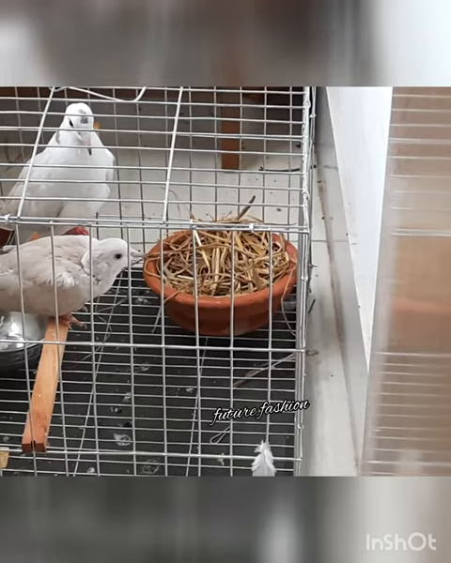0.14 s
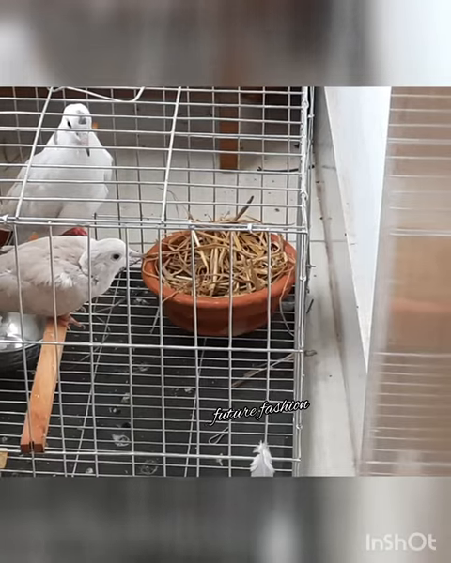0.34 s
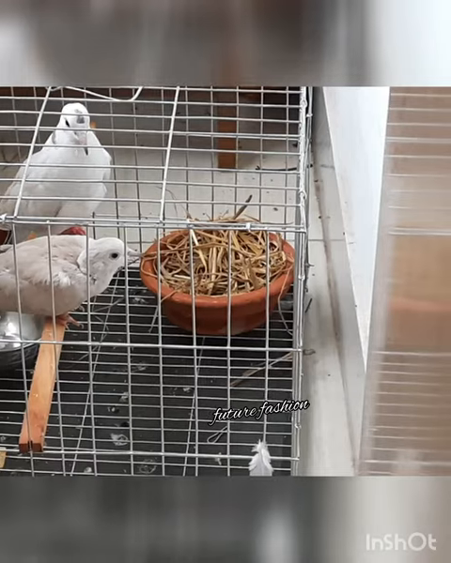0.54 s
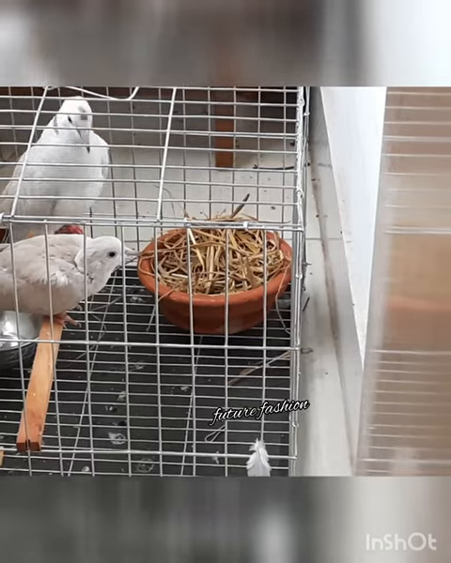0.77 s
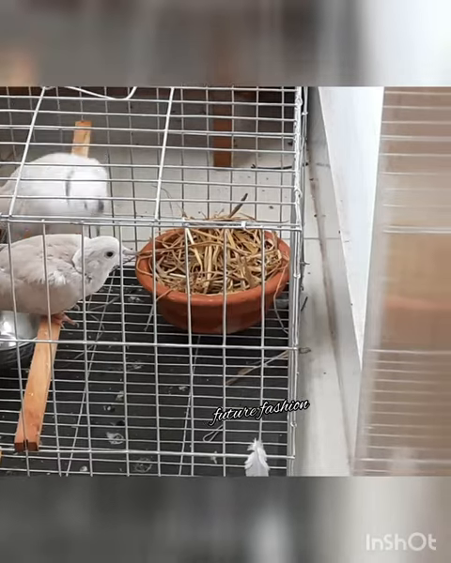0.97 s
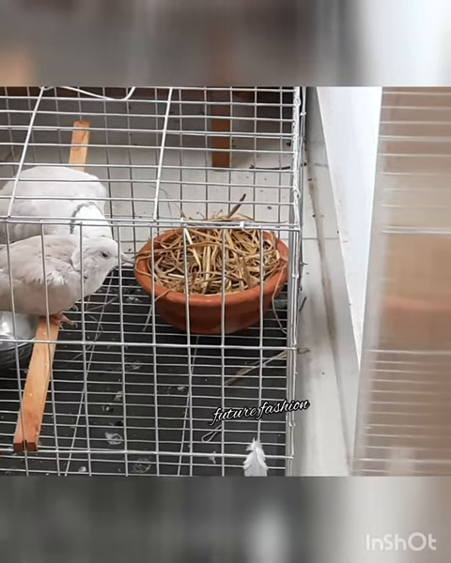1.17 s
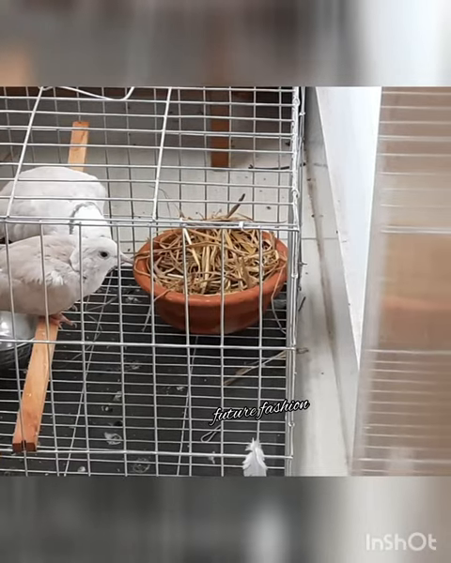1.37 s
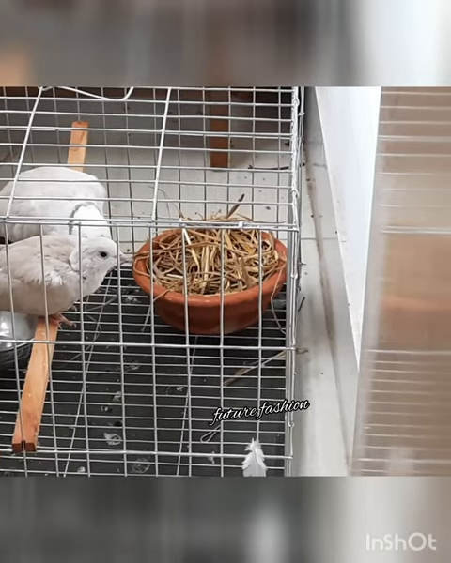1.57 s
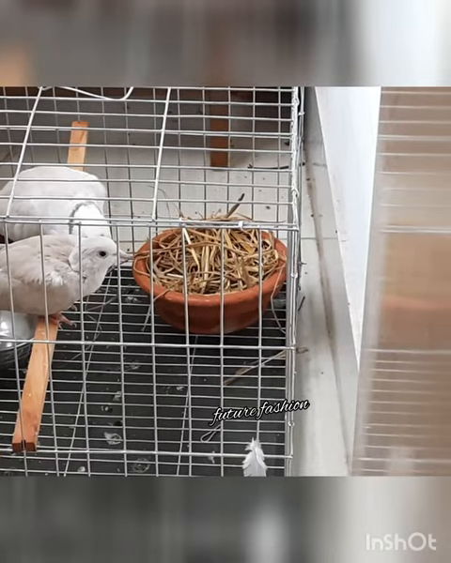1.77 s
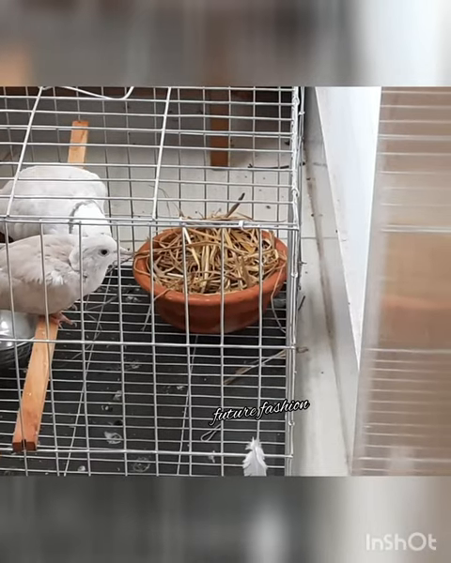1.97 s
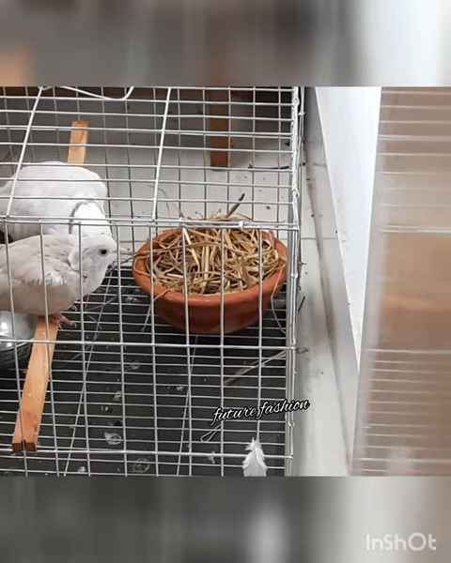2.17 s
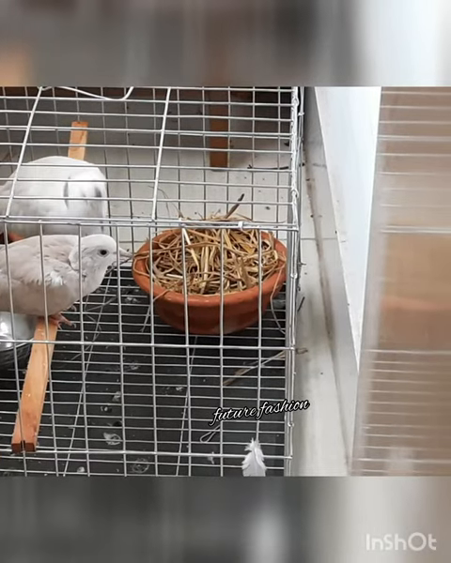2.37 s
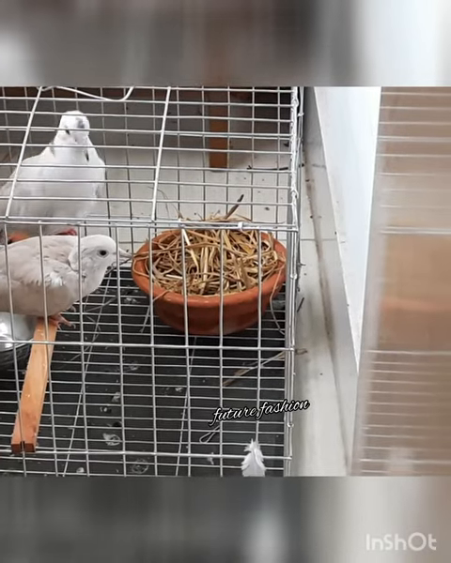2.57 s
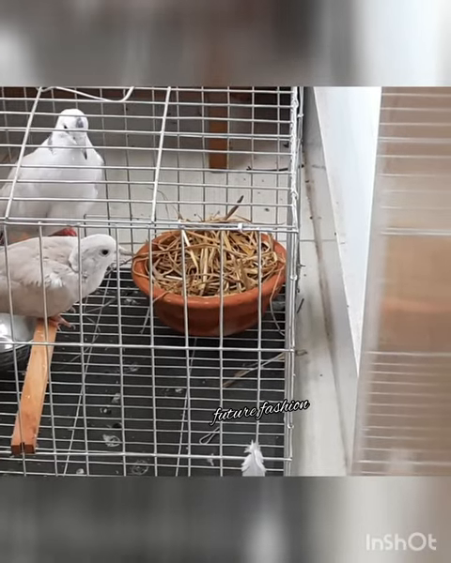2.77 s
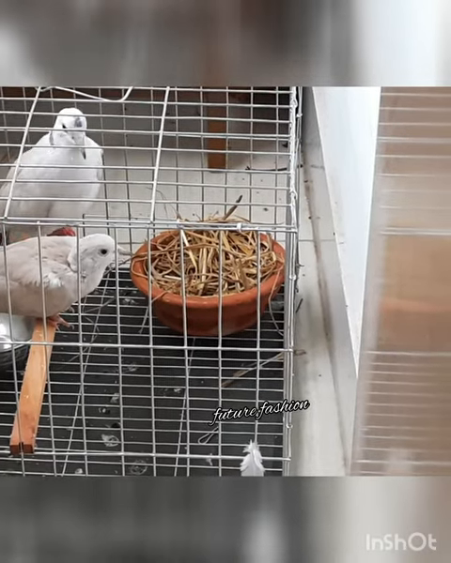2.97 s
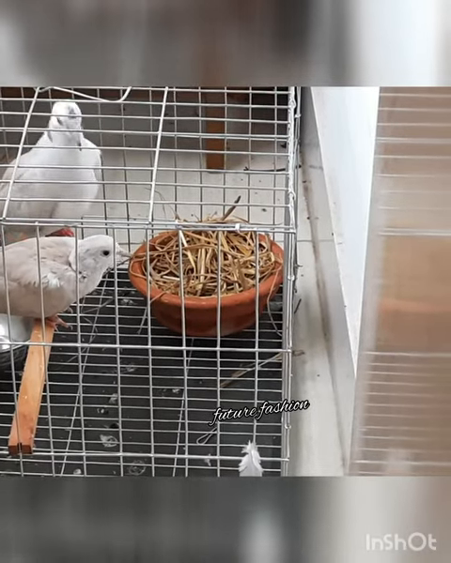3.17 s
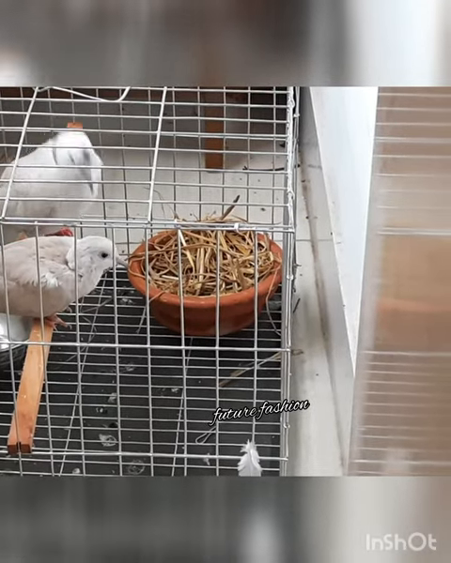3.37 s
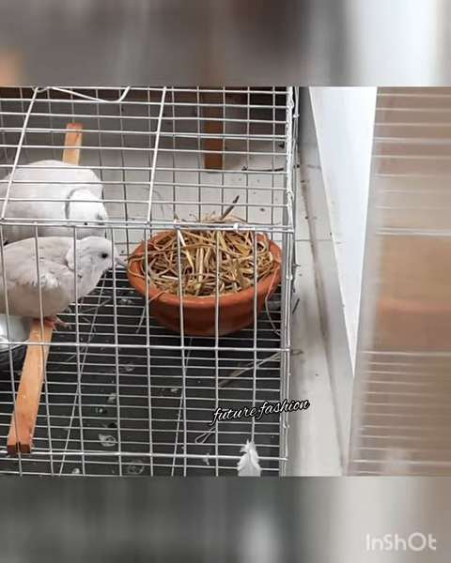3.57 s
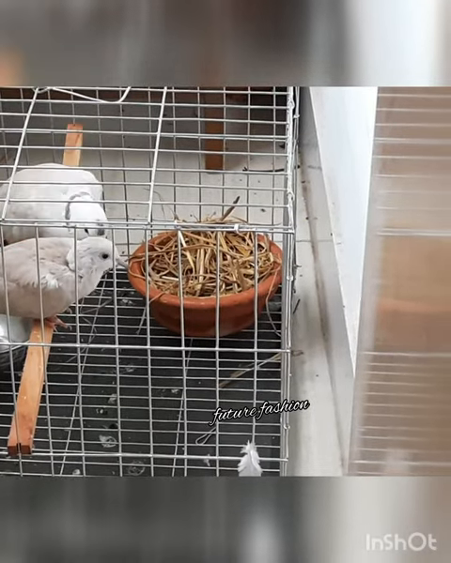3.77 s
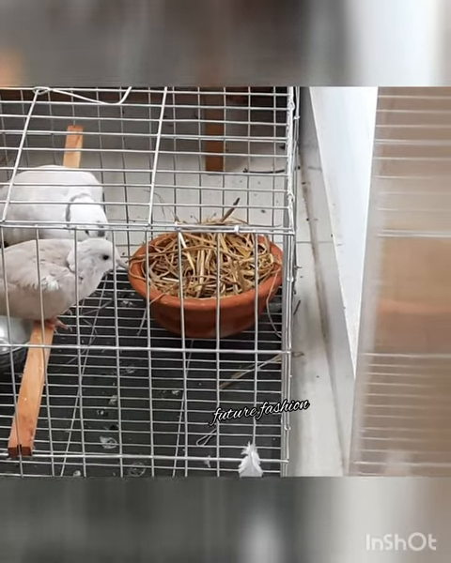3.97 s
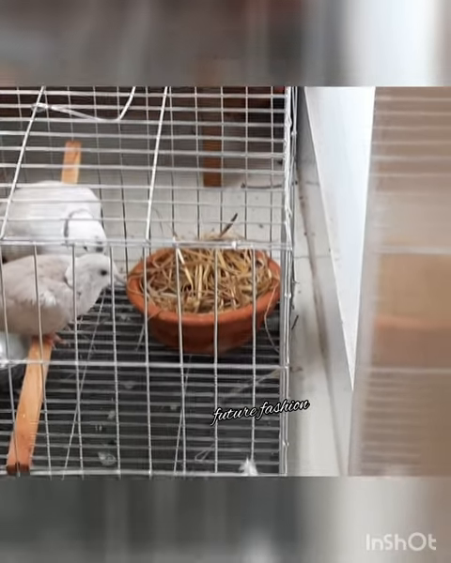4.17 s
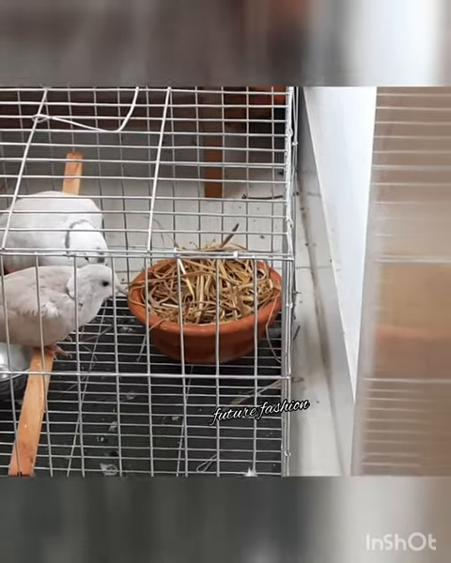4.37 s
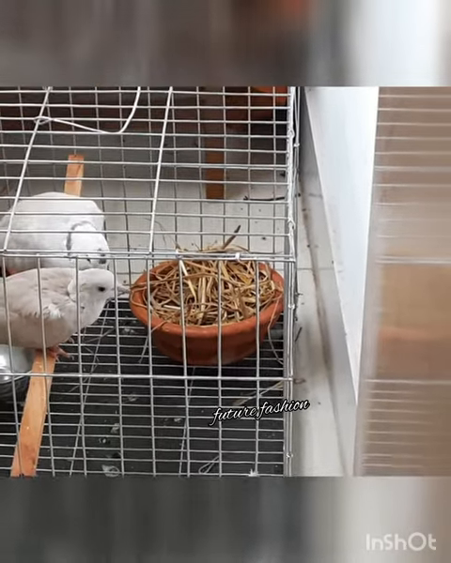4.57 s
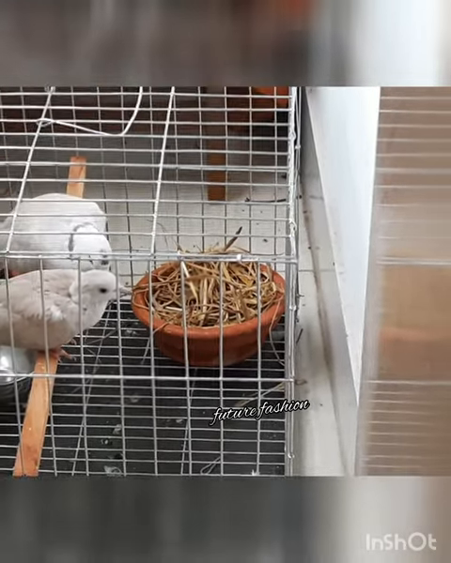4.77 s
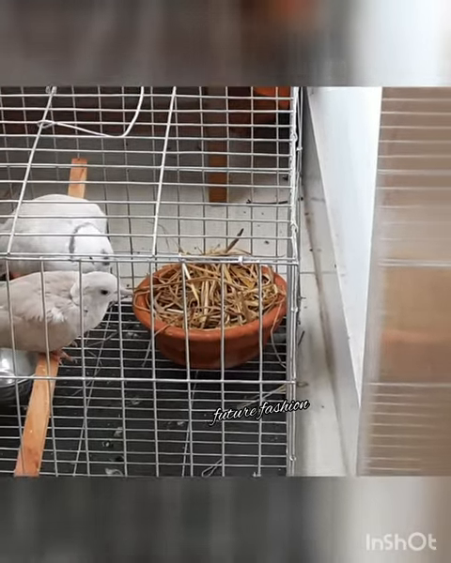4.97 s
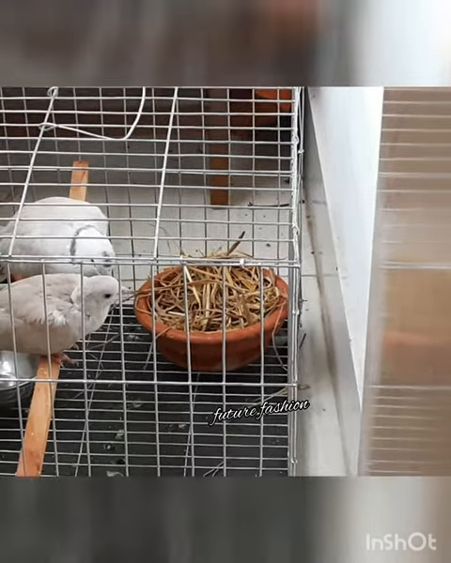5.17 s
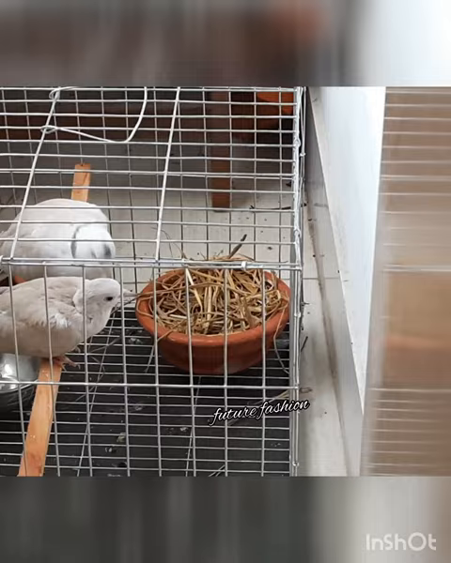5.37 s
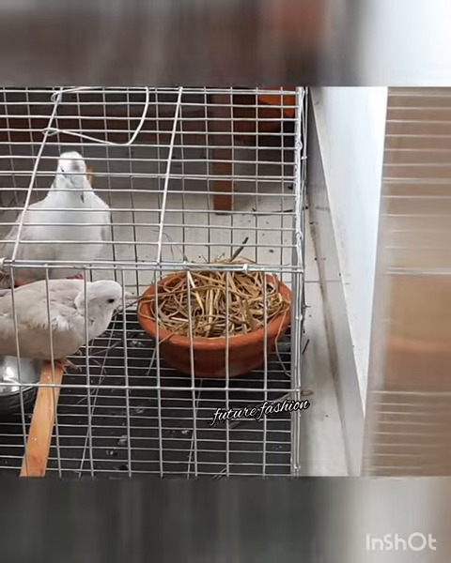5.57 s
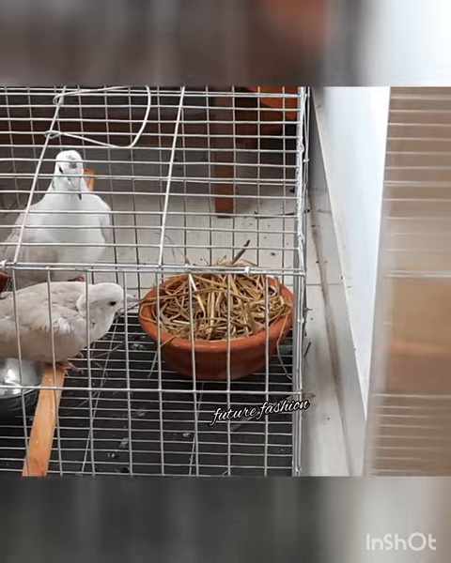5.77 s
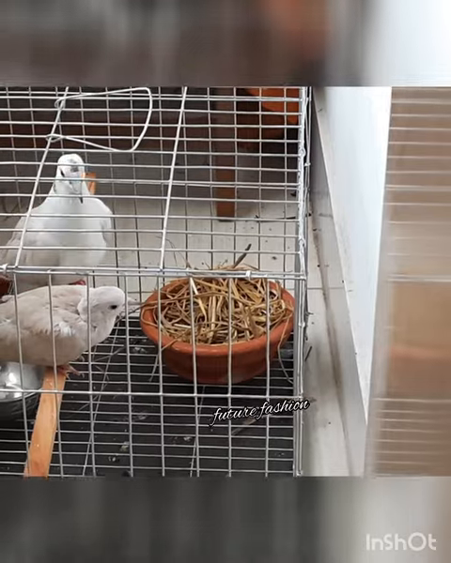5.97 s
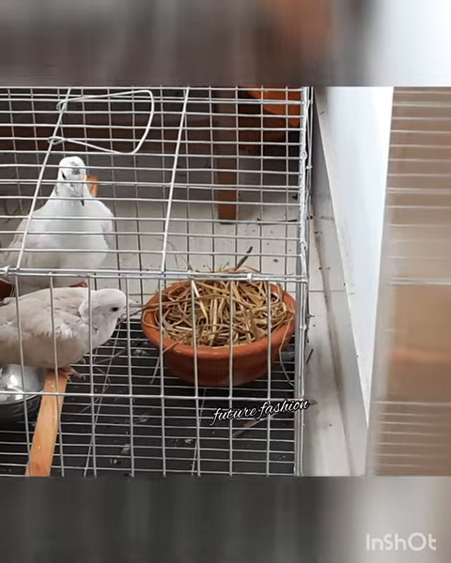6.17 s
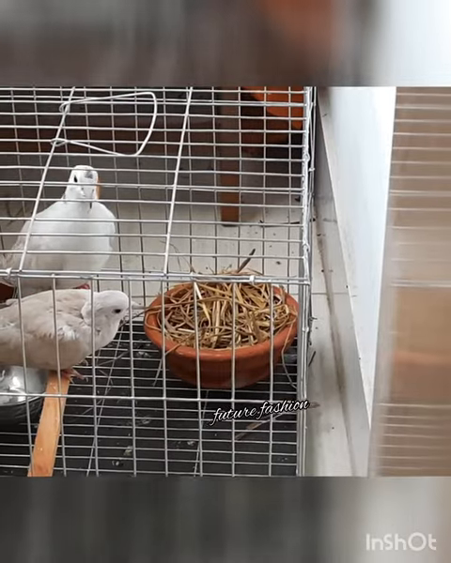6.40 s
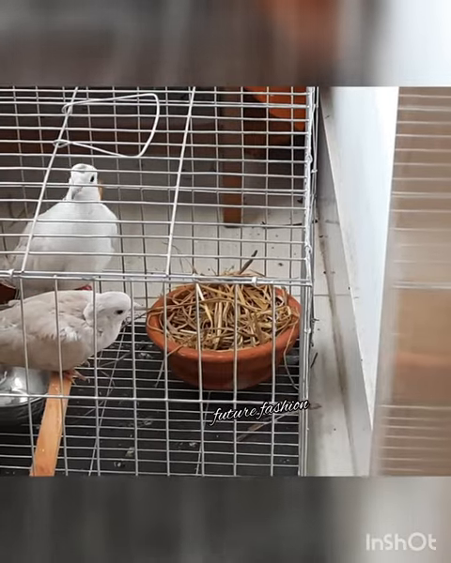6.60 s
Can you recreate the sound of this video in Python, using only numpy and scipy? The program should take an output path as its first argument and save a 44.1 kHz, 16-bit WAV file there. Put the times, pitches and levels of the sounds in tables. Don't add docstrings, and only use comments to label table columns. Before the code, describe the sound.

A dove close by finishes one long sinking coo, then gives two full calls: a short soft hoot, a rolled purring trill that grows stronger, slow throbbing beats, and a long swelling note that breaks downward. The hard wall makes it ring. Behind are low town rumble, a faint motor hum, tiny bird chirps, a thin cricket and a distant dove.

```python
import sys
import numpy as np
from scipy import signal
from scipy.fft import rfft, irfft
from scipy.io import wavfile
from scipy.ndimage import uniform_filter1d

SR = 44100
rng = np.random.default_rng(int(sys.argv[2]) if len(sys.argv) > 2 else 0)


def dump(signal):
    limited = np.clip(np.atleast_2d(signal).T, -1, 1)
    pcm = np.round(limited * 32767).astype(np.int16)
    wavfile.write(sys.argv[1], SR, pcm)


def rack_gain(trim_db):
    fader = np.asarray(trim_db, float)
    return 10 ** (fader / 20)


N = 292804


def evened(x):
    return x / np.sqrt(np.mean(x ** 2) + 1e-20)


def read(points, hz):
    f, value = np.transpose(points)
    return np.interp(np.log(hz + 1), np.log(f + 1), value)


def add(mix, s, sound):
    part = mix[..., round(s * SR):][..., :sound.shape[-1]]
    part += sound[..., :part.shape[-1]]


def resonate(x, hz, width):
    turn = np.exp(2j * np.pi * np.cumsum(hz * np.ones(x.shape[-1])) / SR)
    r = np.exp(-np.pi * width / SR)
    return 2 * (turn * signal.lfilter([1 - r], [1, -r], x / turn + 1e-18)).real


def swell(length, rise, fall):
    t = np.arange(round(length * SR)) / SR
    return np.sin(np.pi / 2 * np.clip(np.minimum(t / rise, (length - t) / fall), 0, 1)) ** 2


def diffuse(t60):
    taps = np.zeros((2, SR))
    at = np.arange(200, SR - 20, 20) + rng.integers(0, 20, (2, (SR - 201) // 20))
    np.put_along_axis(taps, at, rng.choice([-1., 1.], at.shape), 1)
    taps *= rack_gain(-60 * np.arange(SR) / SR / t60)
    return taps / np.linalg.norm(taps[0])


def whistle(length, first_hz, last_hz, width, rise, fall):
    shape = swell(length, rise, fall)
    hz = np.linspace(first_hz, last_hz, len(shape))
    settle = 4000
    noise = rng.standard_normal((2, len(shape) + settle))
    course = np.r_[np.full(settle, first_hz), hz]
    band = resonate(resonate(noise, course, width), course, width)
    return shape * evened(band[:, settle:])


# (pitch [Hz], width [Hz], level [dB])
NOOK_WAVES = [(591, 6, 10), (596.5, 6, 10), (594, 24, 7), (458, 12, 4), (508, 16, 0), (545, 18, -4),
              (660, 14, -4)]


def nook():
    throat_hz, throat_width = 540, 320
    tail = rack_gain(-13) * diffuse(.35)
    click = signal.unit_impulse(SR)
    near = click + sum(rack_gain(db) * resonate(click, hz, width) for hz, width, db in NOOK_WAVES)
    room = np.array([rack_gain(-0.5) * near, rack_gain(-3.5) * np.roll(near, 5)]) + tail
    throat = resonate(resonate(room, throat_hz, throat_width), throat_hz, throat_width)
    return throat + rack_gain(-16) * room


def syrinx(hz, level):
    waver = evened(uniform_filter1d(rng.standard_normal(len(hz) + 900), 700))[:len(hz)]
    phase = 2 * np.pi * np.cumsum(hz * (1 + 0.00081 * waver)) / SR
    overtones = rack_gain(-29.5) * np.sin(2 * phase) + rack_gain(-20.5) * np.sin(3 * phase)
    return np.sqrt(2) * level * (np.sin(phase) + overtones)


def coo(rows, lift):
    s, hz, db = np.transpose(rows)
    t = np.arange(s[0], s[-1], 1 / SR)
    hz = uniform_filter1d(np.interp(t, s, hz), 200)
    nook_gain = np.interp(hz, np.arange(len(lift)), lift)
    effort = uniform_filter1d(rack_gain(np.interp(t, s, db)) / nook_gain, 400)
    return s[0], syrinx(hz, effort * swell(len(t) / SR, .005, .007)[:len(t)])


def pulse(s, db, first_hz, last_hz, length, bend, grow_db):
    shape = swell(length, 0.0029, 0.0097)
    overshoot = 7.1 * max(first_hz - 600, 0) * np.exp(-np.arange(len(shape)) / SR / .004)
    hz = last_hz + (first_hz - last_hz) * np.linspace(1, 0, len(shape)) ** bend + overshoot
    throat_db = -.14 * np.maximum(hz - 605, 0)
    growth_db = grow_db * np.linspace(-.5, .5, len(shape))
    return s - .003, syrinx(hz, rack_gain(db - 11.5 + throat_db + growth_db) * shape)


# (time [s], pitch [Hz], level [dB])
LONG_HIGHS = [
    [(-.06, 620, -36.5), (0.0, 613, -30.5), (.056, 612, -16), (.09, 606.7, -14), (.16, 591.3, -15),
     (.172, 501, -24)],
    [(2.155, 596, -33), (2.167, 617.7, -24), (2.413, 600, -18), (2.491, 587.3, -14), (2.531, 581.5, -19),
     (2.56, 585, -29)],
    [(4.64, 627, -31.5), (4.655, 630, -31), (4.7, 631, -42.5), (4.862, 611, -40), (4.886, 619, -32.5),
     (5.026, 606.5, -19), (5.162, 587.3, -14.5), (5.2, 586.3, -21), (5.242, 550.2, -43)],
]
# (time [s], pitch [Hz])
LOW_TAILS = [
    [(.178, 529.8), (.226, 527.4), (.27, 512), (.432, 503), (.574, 476), (.66, 465)],
    [(2.6, 524.4), (2.608, 507.4), (2.726, 488), (2.752, 471), (2.805, 465)],
    [(5.25, 572), (5.285, 535), (5.32, 495), (5.36, 440)],
]
# (pitch [Hz], level [dB])
TAIL_SINK = [(448, -34), (467, -37), (475.5, -38.5), (487, -31.5), (506, -28), (530, -22), (567, -29.5)]


def long_notes():
    notes = []
    for high, tail in zip(LONG_HIGHS, LOW_TAILS):
        t = np.arange(tail[0][0], tail[-1][0], .004)
        hz = np.interp(t, *np.transpose(tail))
        db = np.interp(hz, *np.transpose(TAIL_SINK))
        notes.append(list(high) + list(zip(t, hz, db)))
    return notes


# (time [s], length [s], level [dB], after-note level [dB])
HOOTS = [
    (1.05, .112, -34.5, -48),
    (3.489, .148, -33.5, -51.5),
]
# (time after start [s], pitch [Hz], level [dB])
HOOT_POP = [
    (0, 493, -20),
    (.009, 505, -26.5),
    (.018, 602, -35),
]


def hoots():
    notes = []
    for s, length, db, after_db in HOOTS:
        body = [(0.032, 665.6, db + 4.0), (0.69 * length, 638.4, db - 3.5),
                (.8 * length, 630, db + .6), (length, 630, db - 5)]
        notes.append([(s + dt, hz, level) for dt, hz, level in list(HOOT_POP) + body])
        after = s + length + 0.022
        notes.append([(after, 576, after_db - 2), (after + .047, 630, after_db)])
    return notes


def hoot_closings():
    return [(s + length + 0.00514, db + 3.5, 627, 518, .03, 1.4, 0.5) for s, length, db, _ in HOOTS]


# (time [s], beats [count], first beat level [dB], last beat level [dB])
ROLLS = [
    (1.355, 10, -42.5, -21.5),
    (3.832, 11, -38, -19.5),
]


def rolls():
    beat_s, length_s, top_hz, low_hz, rise_hz = .036, .032, 600, 449.6, 30
    uneven_db, uneven, bend, grow_db = 1.0, .01, 2.4, 8
    rows = []
    for s, count, first_db, last_db in ROLLS:
        for k, (a, b, c) in enumerate(rng.standard_normal((int(count), 3))):
            u = k / (count - 1)
            db = last_db + (first_db - last_db) * (1 - u) ** 1.8 + uneven_db * a
            last_hz = (low_hz + rise_hz * u) * (1 + uneven * b)
            first_hz = top_hz * (1 + uneven * c)
            rows.append((s + k * beat_s, db, first_hz, last_hz, length_s, bend, grow_db))
    return rows


# (time [s], level [dB], first pitch [Hz], last pitch [Hz], length [s])
CLIMBS = [
    (1.723, -17, 518, 520, 0.026),
    (1.765, -17.5, 518, 586, 0.032),
    (1.803, -19.5, 543, 574, 0.043),
    (4.229, -21, 575, 582, 0.047),
    (2.091, -17, 468, 625, .041),
    (4.58, -17.5, 471, 602.6, 0.029),
]


def climbs():
    return [(*row, 0.25 + 0.015 * abs(row[3] - row[2]), -1.5) for row in CLIMBS]


# (time [s], level [dB], last pitch [Hz], length [s])
FALLS = [
    (1.851, -20, 496.6, 0.051),
    (1.901, -19, 505, 0.054),
    (1.96, -19, 457, 0.084),
    (2.042, -19, 457, 0.062),
    (4.276, -23.5, 560, 0.038),
    (4.325, -20.5, 544, 0.044),
    (4.379, -17.5, 530.7, 0.046),
    (4.442, -19, 463, 0.082),
    (4.521, -20.5, 458, 0.077),
]


def falls():
    top_hz = 606
    rows = []
    for s, db, hz, length in FALLS:
        depth = top_hz - hz
        rows.append((s, db, top_hz + 0.071 * depth, hz, length, 0.44 + .005 * depth, 1.5))
    return rows


def dove():
    lead = 0.1
    x, room = np.zeros(N + round(lead * SR)), nook()
    lift = abs(rfft(room.mean(0)))
    sounds = [coo(rows, lift) for rows in long_notes() + hoots()]
    sounds += [pulse(*row) for row in hoot_closings() + rolls() + climbs() + falls()]
    for s, sound in sounds:
        add(x, s + lead, sound)
    return signal.fftconvolve(x[None], room, axes=1)[:, round(lead * SR):len(x)]


# (time [s], level [dB])
TRAFFIC = [(0.0, -47.5), (0.79, -53), (1.18, -50.5), (1.29, -58.5), (1.68, -46), (1.7, -45), (2.4, -47.5),
           (2.83, -54), (3.81, -53), (4.07, -45), (4.31, -48), (4.4, -46.5), (4.46, -46.5), (5.1, -49),
           (5.49, -54.5), (5.53, -54.5), (6.1, -56.5), (6.64, -51)]
# (frequency [Hz], level per Hz [dB])
TOWN_COLOUR = [(25, -5.5), (64, -8.5), (305, -3), (523, -4.5), (900, -10.5), (1200, -12.5), (3340, -27.5),
               (5880, -38), (8300, -37), (8900, -52.5), (9900, -54), (11000, -47), (12500, -44.5),
               (15500, -49)]
# (frequency [Hz], left over right [dB])
TOWN_LEAN = [(60, 4.5), (290, 0), (640, -1), (1410, -4), (3100, -5.5), (6500, -6.5), (9000, 2.5),
             (12000, -9)]
# (frequency [Hz], left-right likeness [-1 to 1])
TOWN_LIKENESS = [(60, 0.94), (150, 0.93), (380, 0.75), (950, -0.26), (2380, 0.023), (5980, -0.087),
                 (15000, 0.32)]


def town():
    frames, hz = N // 256 + 5, np.fft.rfftfreq(1024, 1 / SR)
    a, b, c, d, patches = rng.standard_normal((frames, 513, 5)).T
    patches = evened(uniform_filter1d(uniform_filter1d(patches, 14, 0), 14, 1))
    s, traffic_db = np.transpose(TRAFFIC)
    t = np.arange(frames) * 256 / SR
    rumble = np.interp(t, s, traffic_db - traffic_db.mean())
    street, hiss = 0.62 * rumble, .5 * rumble
    up, top = (np.clip(np.log(hz / f + 1e-9)[:, None] / np.log(2.2), 0, 1) for f in (450, 2200))
    drift_db = rumble * (1 - up) + street * (up - top) + hiss * top
    same = np.clip(read(TOWN_LIKENESS, hz), -1, 1)[:, None]
    left = a + 1j * b
    z = np.array([left, same * left + np.sqrt(1 - same ** 2) * (c + 1j * d)])
    z *= rack_gain(read(TOWN_COLOUR, hz)[:, None] + drift_db + 1.3 * patches)
    z *= rack_gain(np.array([.5, -.5])[:, None, None] * read(TOWN_LEAN, hz)[:, None])
    return rack_gain(-46.5) * evened(signal.istft(z, nperseg=1024, noverlap=768)[1][:, :N])


# (pitch [Hz], width [Hz], level [dB])
FAN_LINES = [(63, 23, -61), (116.8, 7.8, -60), (194, 6.8, -60.5), (247.2, 20, -61), (294.8, 21, -60),
             (842.5, 19, -61.5)]


def fan():
    noise = rng.standard_normal((2, N))
    noise[1] = .8 * noise[0] + .25 * noise[1]
    return sum(rack_gain(db) * evened(resonate(resonate(noise, hz, w), hz, w)) for hz, w, db in FAN_LINES)


# (time [s], length [s], level [dB], centre [Hz])
BRUSHES = [(0.039, .06, -63.5, 5000), (0.203, .13, -72.5, 13070), (0.591, 0.065, -58, 4590),
           (1.001, .14, -69, 4540), (1.68, .22, -65, 5535), (2.112, .16, -68, 4520),
           (2.534, 0.056, -58.5, 3760), (2.702, .08, -70.5, 6580), (3.196, 0.032, -64.5, 4480),
           (3.409, 0.19, -66, 6530), (4.198, .15, -65.5, 4050), (4.472, .12, -65, 3850),
           (5.44, .12, -68, 4450), (5.704, 0.071, -61, 4200), (6.37, .4, -71, 4544),
           (4.665, .05, -70, 12870)]
# (frequency [Hz], level [dB])
MIC_TREBLE = [(1000, -6), (3000, 5), (8300, -8), (8900, -17), (9900, -16.5), (11000, -11), (12500, -11.5),
              (15500, -3)]


def brushes():
    out = np.zeros((2, N))
    for s, length, db, hz in BRUSHES:
        shape = swell(length, 0.26 * length, 0.72 * length)
        f = np.fft.rfftfreq(len(shape), 1 / SR)
        octaves = np.log2(f / hz + 1e-6)
        colour = rack_gain(read(MIC_TREBLE, f) - 7 * octaves ** 2 / (1 + .6 * abs(octaves)))
        grain = rack_gain(4.0 * rng.standard_normal(len(shape)))
        noise = rng.standard_normal((2, len(shape))) * grain
        add(out, s, rack_gain(db + 4.5) * shape * evened(irfft(rfft(noise) * colour, len(shape))))
    return out


def glides(rows):
    out = np.zeros((2, N))
    for s, length, first_hz, last_hz, db in rows:
        width = 22 + 0.64 * abs(last_hz - first_hz)
        add(out, s, rack_gain(db + 4.5) * whistle(length + 0.024, first_hz, last_hz, width, 0.0081, 0.06))
    return out


# (time [s], pitch [Hz], level [dB])
PEEPS = [(.09, 3797, -70.5), (.26, 2823, -69.5), (1.87, 2825, -71.5), (2.18, 2785, -73.5),
         (2.45, 3730, -67), (3.3, 3715, -70), (4.32, 2762, -68.5), (5.41, 3775, -71), (5.54, 2730, -72),
         (6.12, 2730, -73), (6.5, 4025, -77)]


def piping_bird():
    return glides([(s, .11, hz, hz, db) for s, hz, db in PEEPS])


# (time [s], length [s], level [dB])
CRICKET_CHIRPS = [
    (0.243, 0.13, -80),
    (0.969, 0.31, -72),
    (1.725, 0.4, -68.5),
    (2.508, 0.1, -91.5),
    (3.955, 0.29, -71),
    (4.66, 0.36, -64.5),
    (5.407, 0.31, -71),
    (6.169, 0.43, -72.5),
]


def cricket():
    out, wing_hz = np.zeros((2, N)), 6300
    for s, length, db in CRICKET_CHIRPS:
        add(out, s, rack_gain(db) * whistle(length, wing_hz, wing_hz, 28, 0.011, 0.35))
        add(out, s, rack_gain(db - 15.0) * whistle(length, 2 * wing_hz, 2 * wing_hz, 60, .01, .12))
    return out


# (time [s],
# length [s], pitch [Hz], level [dB])
WIRES = [(1.62, 0.061, 2163, -65.5), (1.7, 0.2, 4142, -68.5), (1.72, .1, 3220, -69), (3.42, .2, 3415, -67),
         (3.52, 0.048, 3410, -59.5), (3.442, .18, 3730, -71), (3.62, .56, 3410, -76.5),
         (4.5, 0.057, 2973, -62.5), (4.5, .12, 2357, -62.5), (4.53, .06, 4140, -68.5),
         (4.51, 0.057, 2200, -67), (4.65, .35, 1884, -72), (5.97, .36, 3300, -71.5),
         (6.4, .23, 2740, -75.5), (6.45, .2, 3425, -68), (1.36, 0.11, 5600, -82), (1.74, .12, 5550, -80),
         (5.98, .3, 3840, -80), (6.4, .22, 3807, -77), (0.564, .06, 3950, -71), (1.05, .12, 1915, -76)]


def singing_wires():
    return glides([(s, length, hz, hz, db) for s, length, hz, db in WIRES])


# (time [s], length [s], first pitch [Hz], last pitch [Hz], level [dB])
FAR_COOS = [
    (0.691, 0.13, 660, 640, -52),
    (0.743, 0.27, 428, 417, -59),
    (0.826, 0.19, 850, 908, -59.5),
    (0.875, 0.17, 588, 604, -60),
    (2.84, 0.165, 627, 565, -51.5),
    (5.397, 0.29, 606, 578, -60),
]


def far_dove():
    out = np.zeros((2, N))
    for s, length, first_hz, last_hz, db in FAR_COOS:
        blur = whistle(length, first_hz, last_hz, 17, 0.029, 0.029)
        add(out, s, rack_gain(db) * (blur + 0.77 * blur[::-1]))
    return out


# (time [s], length
# [s], first pitch [Hz], last pitch [Hz], level [dB])
FAR_CHIRPS = [(0.896, .12, 4350, 3850, -74.5), (1.79, 0.099, 3495, 3386, -62.5),
              (2.141, .12, 4230, 3600, -66), (2.116, 0.083, 5320, 4600, -72.5),
              (3.414, .045, 6950, 6700, -69), (3.434, .043, 3387, 3375, -59),
              (3.676, 0.06, 3447, 3455, -62.5), (4.196, 0.092, 3760, 4100, -68),
              (4.264, 0.067, 4470, 3910, -72.5), (4.258, 0.075, 3260, 3360, -64.5),
              (4.478, .07, 4630, 4690, -70), (4.487, 0.1, 3540, 3655, -61.5), (4.524, .05, 4330, 4800, -68),
              (4.564, 0.055, 4880, 4957, -61), (4.578, 0.046, 5010, 4880, -69),
              (5.05, 0.19, 1830, 1715, -70), (5.854, .05, 3980, 4360, -74), (5.845, 0.062, 4310, 4660, -72),
              (5.87, 0.084, 4700, 4440, -70), (6.349, .25, 3260, 3323, -68.5),
              (6.402, .24, 3770, 3620, -76)]


def small_birds():
    return glides(FAR_CHIRPS)


def outdoors():
    out = brushes() + piping_bird() + cricket() + singing_wires() + small_birds()
    out = out + rack_gain(-5.5) * signal.fftconvolve(out, diffuse(0.42), axes=1)[:, :N]
    return out * rack_gain(np.array([[-2.5], [2.5]]))


# (time [s], peak level [dB], left over right [dB])
CLAW_TICKS = [
    (3.2143, -60.5, -10),
]


def claws():
    out, t = np.zeros((2, N)), np.arange(700) / SR
    colour = rack_gain(read(MIC_TREBLE, np.fft.rfftfreq(len(t), 1 / SR)))
    for s, db, pan_db in CLAW_TICKS:
        burst = rng.standard_normal((2, len(t))) * rack_gain(-60 * t / .014)
        burst = irfft(rfft(burst) * colour, len(t))
        add(out, s, rack_gain(db - 4.0 + np.array([[.5], [-.5]]) * pan_db) * burst)
    return out


def scene():
    return dove() + town() + fan() + outdoors() + far_dove() + claws()


def roll_off(x):
    return signal.sosfilt(signal.butter(12, 15650, fs=SR, output="sos"), x)


def record(dry):
    mix = signal.sosfilt(signal.butter(4, 44, "high", fs=SR, output="sos"), dry)
    treble_cut = signal.firwin(511, 15750, window=("kaiser", 9), fs=SR)
    mix = signal.oaconvolve(mix, treble_cut[None], "same")
    return roll_off(mix)


dry = scene()
out = record(dry)
dump(out)
```